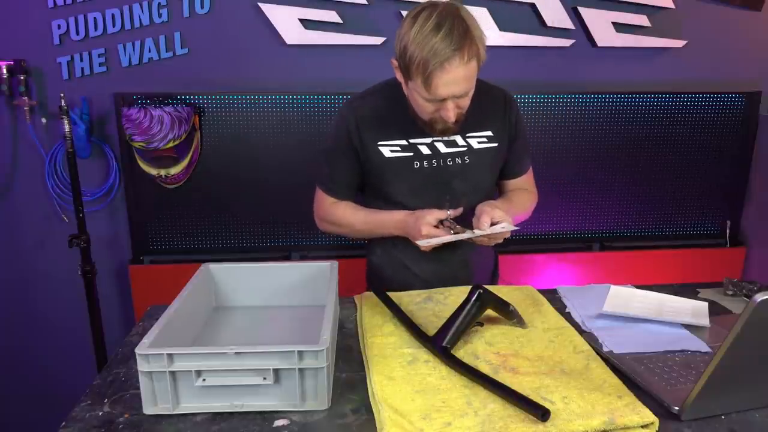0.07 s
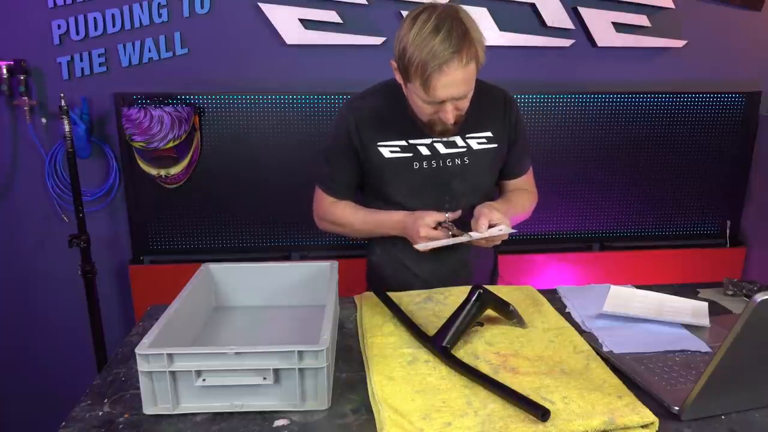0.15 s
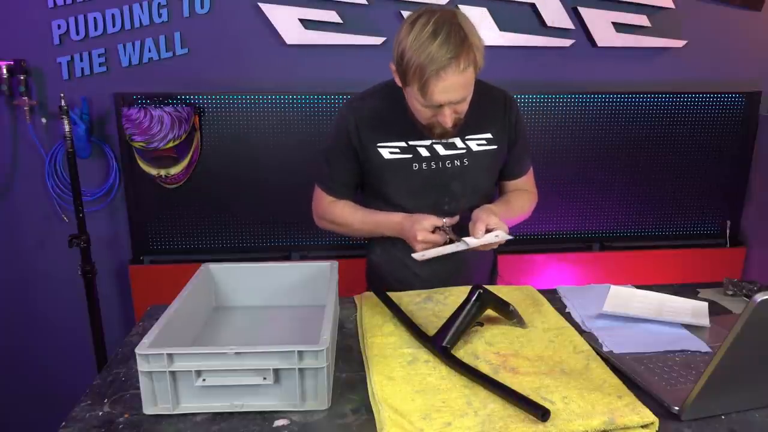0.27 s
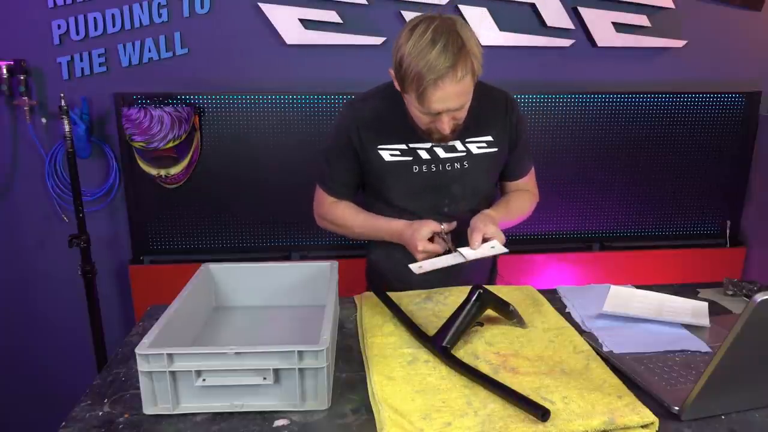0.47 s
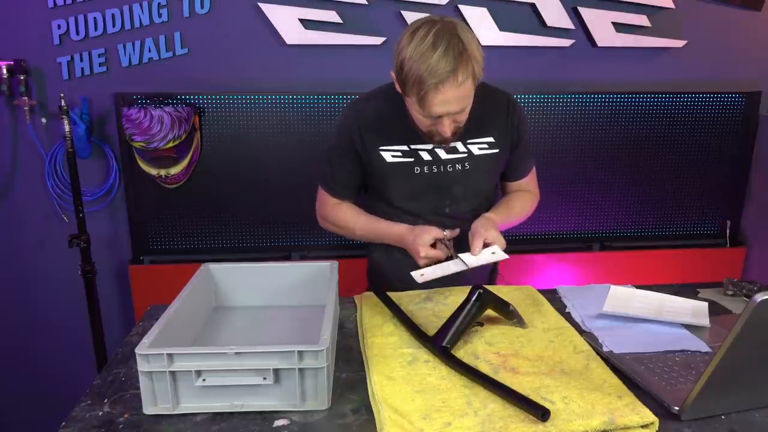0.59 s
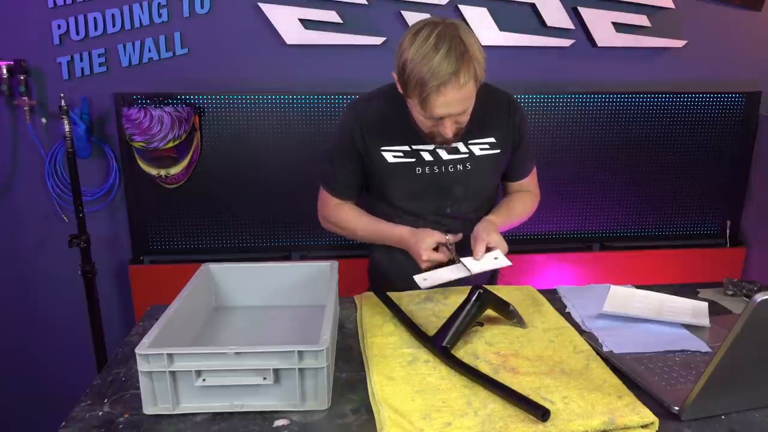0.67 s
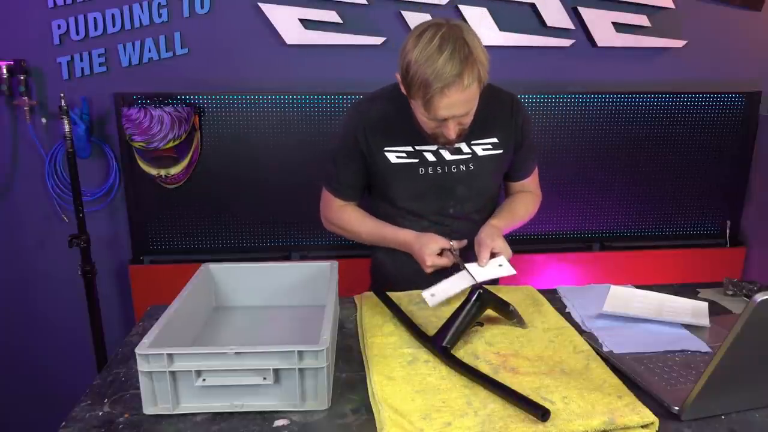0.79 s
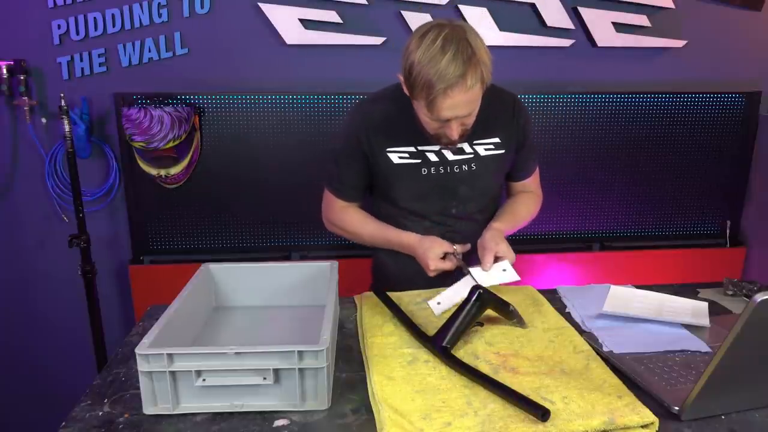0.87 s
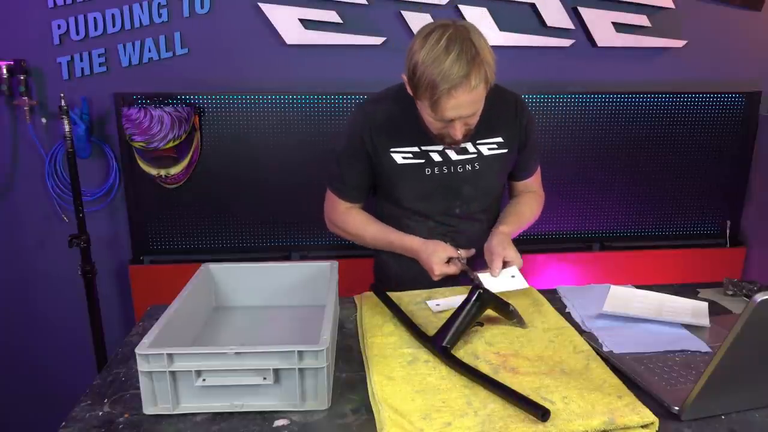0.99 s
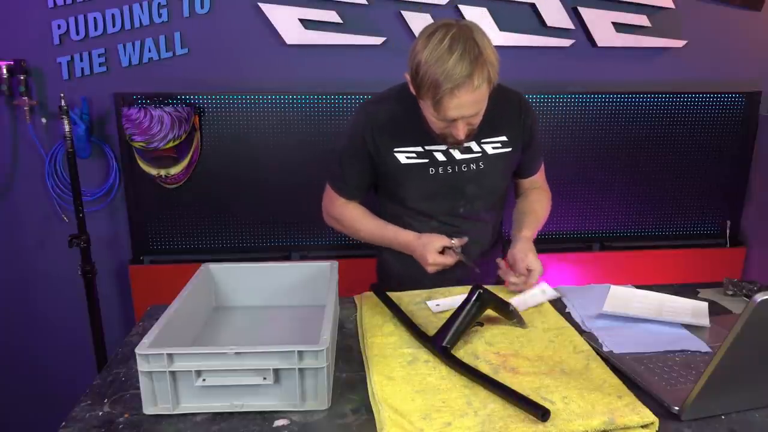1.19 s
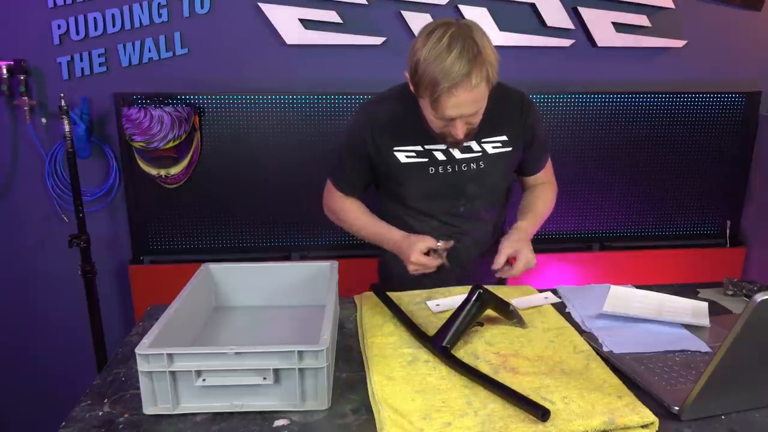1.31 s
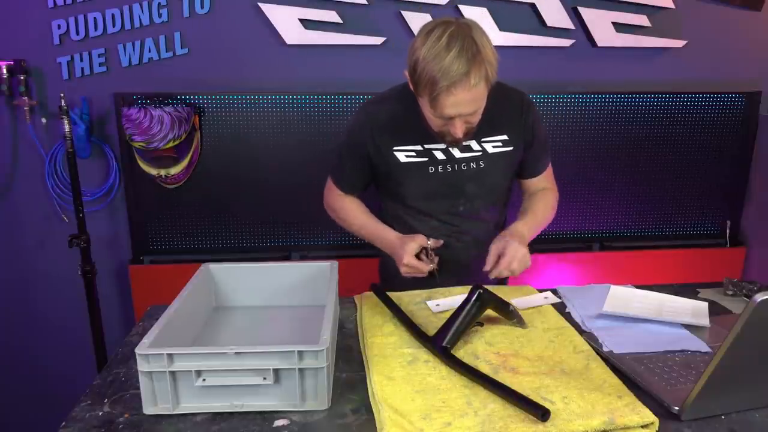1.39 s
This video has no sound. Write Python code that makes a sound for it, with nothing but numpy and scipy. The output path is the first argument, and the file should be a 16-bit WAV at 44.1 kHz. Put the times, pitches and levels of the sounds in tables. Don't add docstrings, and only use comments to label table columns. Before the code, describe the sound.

Close scissor snips crunch through a card strip, snap shut twice, then squeak faintly open

```python
import sys
import numpy as np
from scipy import signal
from scipy.fft import rfft, irfft
from scipy.io import wavfile
from scipy.ndimage import uniform_filter1d

SR = 44100
rng = np.random.default_rng(int(sys.argv[2]) if len(sys.argv) > 2 else 0)


def magnitude_from_level(level_db):
    exponent = np.asarray(level_db, float) / 20
    return 10 ** exponent


def store_wav(level_fs):
    pcm = np.round(np.clip(np.atleast_2d(level_fs), -1, 1) * 32767)
    wavfile.write(sys.argv[1], SR, pcm.T.astype(np.int16))


N = 63945

# [frequency_hz, level_db]
STEEL_SPECTRUM = [(1470, 3), (2500, -5), (5180, -9), (7430, -7), (9480, -12.5), (15100, -16.5), (16300, -8)]


def evened(x):
    return x / np.sqrt(np.mean(x ** 2) + 1e-20)


def read(points, hz):
    f, value = np.transpose(points)
    return np.interp(np.log(hz + 1), np.log(f + 1), value)


def add(mix, s, sound):
    part = mix[max(round(s * SR), 0):][:len(sound)]
    part += sound[:len(part)]


def colour(x, points):
    hz = np.fft.rfftfreq(N, 1 / SR)
    inside = (hz > points[0][0]) * (hz < points[-1][0])
    return evened(irfft(rfft(x) * magnitude_from_level(read(points, hz)) * inside, N))


def resonate(x, hz, width_hz):
    turn = np.exp(2j * np.pi * np.cumsum(hz * np.ones(len(x))) / SR)
    r = np.exp(-np.pi * width_hz / SR)
    return 2 * (turn * signal.lfilter([1 - r], [1, -r], x / turn)).real


def resonate_twice(x, hz, width_hz):
    return evened(resonate(resonate(x, hz, width_hz), hz, width_hz))


def swell(length_s, rise):
    u = np.linspace(0, 1, max(round(length_s * SR), 8))
    bend = np.log(.5) / np.log(np.clip(rise, .05, .9))
    return np.sin(np.pi * u ** bend) ** 2


def ring(modes, rise_s):
    push_peak_s = .00075
    t = np.arange(SR // 5) / SR
    total = sum(magnitude_from_level(db - 60 * t / t60) * np.cos(2 * np.pi * hz * (t - push_peak_s)) for hz, db, t60 in modes)
    return -total * (1 - np.exp(-t / rise_s))


def background():
    # [frequency_hz, level_db]
    air_spectrum = [(59, 3), (100, -1.5), (202, -12), (586, -8.5), (638, -5.5), (1240, -5), (4940, -22.5),
                    (14900, -27.5), (16300, -28)]
    # [frequency_hz, level_db]
    rumble_spectrum = [(8.8, -13), (15, -13.5), (53, 4), (128, -39), (172, -17.5), (200, -20), (260, -39),
                       (440, -120)]
    # [start_s, pitch_hz, level_db, t60_s]
    bumps = [(1.370, 40, -35, 0.11), (1.285, 51, -48.5, 0.11), (1.3, 47, -52, 0.088), (0.59, 38, -55, 0.11),
             (1.04, 50, -48, .14), (1.075, 50, -52, .1), (.97, 57, -53, .1), (.395, 55, -52, .12),
             (.635, 50, -52, .12), (.46, 55, -55, .1), (1.17, 50, -56, .12)]
    air_db, rumble_db = -64, -70.5
    drift = evened(uniform_filter1d(uniform_filter1d(rng.standard_normal(N), 2500), 2500))
    out = magnitude_from_level(air_db + drift) * colour(rng.standard_normal(N), air_spectrum)
    out += magnitude_from_level(rumble_db + 0.56 * drift[::-1]) * colour(rng.standard_normal(N), rumble_spectrum)
    for s, hz, db, t60 in bumps:
        add(out, s, ring([(hz, db, t60)], 0.011))
    return out


def steel(grit):
    # [frequency_hz, level_db]
    tip_hiss = [(1470, -59), (2500, -7.5), (6060, -9), (15300, -19), (16300, -32)]
    # [start_s, end_s, pitch_hz, level_db]
    blade_lines = [(0, 0.143, 5610, -6), (0, 0.116, 8300, -7), (0, 0.264, 7240, -7.5),
                   (0.224, 0.315, 4220, -3), (0.173, 0.197, 14100, -4), (.196, 0.232, 14600, -4),
                   (0.65, .76, 7400, -6.5), (0.683, 0.76, 10100, -13), (0.694, 0.75, 12100, -9.5),
                   (0.707, .79, 14900, -6), (0.724, 0.806, 4000, -5), (0.858, 0.943, 3230, 1),
                   (0.8, .845, 2740, -4), (0.8, 0.845, 4650, 0), (0.845, 0.9, 6140, -1),
                   (0.77, 0.925, 7500, -5.5), (0.837, 0.922, 8200, -5)]
    tips_from_s, tips_db, sharpness = .808, 0.5, 14
    before_tips = np.arange(N) < tips_from_s * SR
    out = np.where(before_tips, colour(grit, STEEL_SPECTRUM), magnitude_from_level(tips_db) * colour(grit, tip_hiss))
    for start, end, hz, db in blade_lines:
        shape, at = np.sqrt(swell(end - start, 0.51)), max(round(start * SR), 0)
        line = resonate_twice(grit[at:at + len(shape)], hz, hz / sharpness)
        add(out, start, magnitude_from_level(db) * shape * line)
    return out


def torn_fibres():
    spread_db, breaks_per_s = 2.2, 20000
    strength = magnitude_from_level(spread_db * np.minimum(rng.exponential(1, N), 4))
    breaks = rng.random(N) < breaks_per_s / SR
    return evened(rng.standard_normal(N) * strength * breaks)


def cutting():
    # [start_s, peak_db, strip_hz, treble_db, length_s]
    first_stroke = [(0.009, -67, 972, 3, 0.01), (0.046, -44.5, 1345, -19, 0.0084),
                    (0.065, -68, 1750, -8, 0.0093), (0.08, -46, 1485, -16.5, 0.016),
                    (0.111, -39.5, 724, -14, 0.012), (0.129, -54.5, 980, -1.5, 0.017),
                    (0.154, -40, 1007, -12.5, 0.0076), (0.174, -43, 1460, -8.5, 0.0077),
                    (0.198, -40.5, 965, -13, 0.015), (0.215, -34.5, 1324, -19, 0.013),
                    (0.234, -28.5, 1580, -23, 0.013), (0.2558, -36, 1826, -19, 0.0053),
                    (0.262, -28.5, 1700, -22.5, 0.0091), (0.27, -36.5, 2020, -21, 0.025)]
    second_stroke = [(0.678, -40, 1230, -11, 0.017), (0.69, -40, 1043, -21.5, 0.015),
                     (0.701, -35, 1297, -28, 0.012), (0.719, -41.5, 1290, -39, 0.011),
                     (0.726, -64.5, 1420, -26.5, 0.0071), (0.734, -30.5, 1046, -41, 0.017),
                     (0.754, -35.5, 978, -20.5, 0.017), (0.774, -44.5, 760, -18, 0.014),
                     (0.793, -34.5, 1090, -17, 0.009), (0.815, -42, 1300, -17.5, 0.016),
                     (0.823, -38.5, 1004, -22, 0.017), (0.852, -35, 1130, -22.5, 0.011),
                     (0.864, -42.5, 1240, -16, 0.0092), (0.876, -40.5, 1010, -19, 0.0087),
                     (0.888, -41, 1160, -16, 0.0091)]
    flutter = [(0.911, -40, 1400, -15, 0.0074), (0.926, -44, 1530, -11.5, 0.0092),
               (0.4487, -25.5, 880, -20.5, 0.008), (0.459, -34, 717, -22.5, 0.0094),
               (0.467, -38.5, 640, -27, 0.026), (0.514, -51, 1810, -31, .012),
               (.528, -40, 1530, -21, 0.011), (0.493, -38, 1100, -41, 0.014),
               (0.558, -48, 1770, -31, 0.028), (0.613, -46, 2180, -25, 0.01),
               (0.9452, -29, 1400, -29, 0.0078), (0.961, -41, 1580, -38, 0.017),
               (0.982, -41.5, 943, -39, 0.018)]
    bites = [
        (.4285, -37, 1950, -25, .005),
        (.921, -38, 3100, -14, .004),
        (.9225, -37, 1450, -30, .005),
    ]
    # [start_s, end_s, level_db]
    drags = [(0.002, 0.15, -65), (0.165, 0.284, -56), (0.71, 0.768, -51), (0.95, 0.968, -62),
             (0.421, 0.615, -58.5), (0.545, 0.633, -64.5)]
    # [frequency_hz, level_db]
    card_spectrum = [(88, -72), (150, -14), (385, -14.5), (508, -5), (858, -5), (1570, -5), (3140, -19),
                     (4020, -20), (6000, -33), (7800, -99), (13200, -120)]
    slip_db, hum_db, treble_gain_db, hum_width_hz = -16.5, -1, 10, 114
    grit = torn_fibres()
    card, metal, out = colour(grit, card_spectrum), steel(grit), np.zeros(N)
    for s, db, hz, treble_db, length in first_stroke + second_stroke + flutter + bites:
        shape, at = swell(2 * length, .33), max(round((s - .002) * SR), 0)
        part = slice(at, at + len(shape))
        hum = magnitude_from_level(hum_db) * resonate_twice(grit[part], hz, hum_width_hz)
        treble = magnitude_from_level(treble_db + treble_gain_db) * metal[part]
        out[part] += shape * magnitude_from_level(db + slip_db) * (evened(card[part]) + hum + treble)
    rub = np.roll(card, 999) + magnitude_from_level(-8.0) * np.roll(metal, 99)
    for start, end, db in drags:
        at = round(start * SR)
        shape = np.sqrt(swell(end - start, 0.16))
        out[at:at + len(shape)] += magnitude_from_level(db) * shape * rub[at:at + len(shape)]
    return out


def contacts():
    # [start_s, level_db, length_s, pitch_hz, hiss_db]
    scrapes = [
        (.015, -68, .006, 7490, 4),
        (.0405, -66, .006, 7440, 4),
        (.0625, -64, .006, 7260, 4),
        (.085, -65, .006, 5490, 4),
    ]
    ticks = [
        (1.0243, -52, .004, 2280, 2),
        (1.2255, -62.5, .003, 2500, -16),
        (1.268, -65.5, .012, 3000, -4),
    ]
    out, crackle = np.zeros(N), colour(rng.standard_normal(N), STEEL_SPECTRUM)
    for s, db, length, hz, hiss_db in ticks + scrapes:
        shape = swell(length, 0.22)
        push = evened(crackle[round(s * SR):][:len(shape)])
        add(out, s, magnitude_from_level(db) * shape * (magnitude_from_level(hiss_db) * push + resonate_twice(push, hz, 570)))
    return out


def knocks():
    # [start_s, peak_db, pitch_hz, t60_s]
    releases = [(.156, -40.5, 1000, .02), (.177, -39.5, 956, 0.013), (0.213, -39.5, 1530, .015),
                (0.2188, -38, 1430, 0.019), (.235, -39, 1500, 0.018), (0.237, -31, 1550, 0.018),
                (.243, -47, 1614, 0.015), (0.257, -51, 1700, 0.01), (.262, -39.5, 930, 0.017),
                (.265, -37, 1690, 0.016), (.285, -42, 1900, .02), (.474, -39, 810, 0.016),
                (.499, -39, 1084, 0.027), (0.507, -42, 1074, 0.049), (0.69, -38, 1370, 0.015),
                (.693, -41.5, 990, .02), (0.702, -44, 1250, 0.024), (0.705, -33.5, 1390, 0.014),
                (0.718, -34, 1320, 0.023), (.729, -35, 1145, 0.018), (.7375, -28.5, 1160, 0.016),
                (0.741, -34, 1070, 0.012), (0.756, -34, 1024, 0.025), (.760, -37.5, 990, 0.025),
                (0.766, -40, 1030, 0.012), (.795, -36, 980, 0.034), (0.8, -36, 1190, .015),
                (.818, -40, 1260, 0.014), (.852, -42, 1110, 0.018), (.857, -46, 1170, 0.013)]
    out = np.zeros(N)
    for s, db, hz, t60 in releases:
        add(out, s, ring([(hz, db, t60)], 0.00052))
    return out


def snaps():
    closing_s = .4357, .9369
    # [rise_s, crack_db, t60_s]
    cracks = [
        (.0008, -37, .022),
        (.0011, -43, .035),
    ]
    # [pitch_hz, level_db, t60_s]
    first_modes = [(290, -42, .09), (474, -32, .05), (600, -25, .02), (705, -18, .03), (933, -15, .018),
                   (1250, -15, .012), (1760, -16.5, .016), (2246, -17, .0075), (2800, -19, .005),
                   (3400, -19, .004), (4300, -18, .003), (8010, -25, .0045)]
    second_modes = [(725, -27, 0.024), (937, -27.5, 0.047), (3060, -36, 0.01), (1400, -13.5, 0.013),
                    (1700, -21.5, 0.012), (1826, -20.5, 0.014), (5660, -38.5, 0.02), (471, -39.5, 0.053)]
    out, crackle = np.zeros(N), colour(rng.standard_normal(N), STEEL_SPECTRUM)
    t = np.arange(3000) / SR
    b, a = signal.butter(2, 190, "high", fs=SR)
    for s, (rise, crack_db, t60), modes in zip(closing_s, cracks, (first_modes, second_modes)):
        add(out, s, signal.lfilter(b, a, ring(modes, rise)))
        shape = magnitude_from_level(crack_db - 60 * t / t60) * (1 - np.exp(-t / rise))
        add(out, s - rise, shape * crackle[round(s * SR):][:len(t)])
    return out


def echoed(x):
    # [delay_s, level_db]
    reflections = [
        (.0036, -16),
        (.0135, -29),
        (.0165, -28),
    ]
    return x + sum(magnitude_from_level(db) * np.roll(x, round(s * SR)) for s, db in reflections)


def pivot():
    # [delay_ms, length_ms, start_hz, end_hz, level_db]
    partials = [(10, 28, 1180, 1120, -58), (42, 22, 950, 780, -57), (33, 35, 2100, 2150, -61),
                (14, 40, 4800, 5700, -66), (46, 20, 3400, 4000, -63), (6, 36, 6800, 7000, -67),
                (12, 35, 9200, 8900, -66), (44, 30, 8600, 7700, -64), (30, 30, 9600, 10300, -67),
                (15, 30, 12900, 13200, -71)]
    # [start_s, length_s, level_db]
    soft_rub = (1.365, .08, -60)
    opening_s, width_hz = 1.36, 300
    out = np.zeros(N)
    for delay_ms, length_ms, from_hz, to_hz, db in partials:
        shape = swell(length_ms / 1000, .45)
        hz, noise = np.linspace(from_hz, to_hz, len(shape)), rng.standard_normal(len(shape))
        add(out, opening_s + delay_ms / 1000, magnitude_from_level(db) * shape * resonate_twice(noise, hz, width_hz))
    start_s, length_s, level_db = soft_rub
    shape = swell(length_s, 0.44)
    add(out, start_s, magnitude_from_level(level_db) * shape * colour(rng.standard_normal(N), STEEL_SPECTRUM)[:len(shape)])
    return out


def shop(x):
    # [frequency_hz, t60_s]
    decay = [(250, 0.54), (700, 0.49), (1500, 0.7), (3000, 0.98), (8000, 0.73), (15000, 0.54)]
    taps = np.zeros(SR)
    at = np.arange(300, SR - 20, 20)
    taps[at + rng.integers(0, 20, len(at))] = rng.choice([-1., 1.], len(at))
    hz, t, z = signal.stft(taps, SR, nperseg=256)
    tail = signal.istft(z * magnitude_from_level(-60 * t / read(decay, hz)[:, None]), SR, nperseg=256)[1]
    return signal.fftconvolve(x, tail / np.linalg.norm(tail))[:N]


def scene():
    near = cutting() + knocks() + echoed(snaps() + contacts()) + pivot()
    return (near + magnitude_from_level(-17.5) * shop(near) + background())[None]


def low_pass(x):
    return signal.sosfilt(signal.butter(12, 16431, fs=SR, output="sos"), x)


def record(dry):
    ceiling, edge_hz, shelf_db = .42, 15800, -32
    dry = ceiling * np.tanh(dry / ceiling)
    dull = signal.oaconvolve(dry, signal.firwin(301, edge_hz, fs=SR)[None], "same")
    return low_pass(dull + magnitude_from_level(shelf_db) * (dry - dull))


dry = scene()
out = record(dry)
store_wav(out)
```